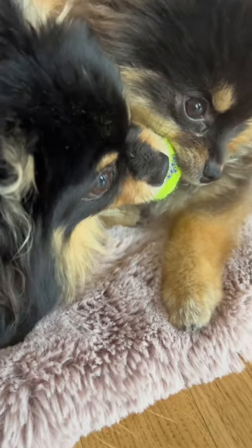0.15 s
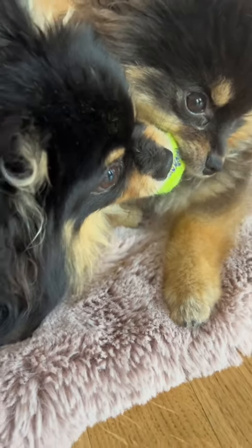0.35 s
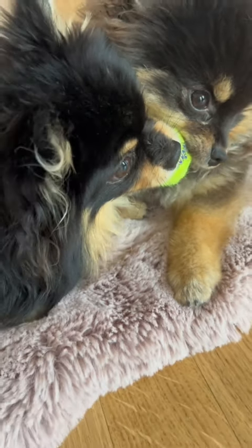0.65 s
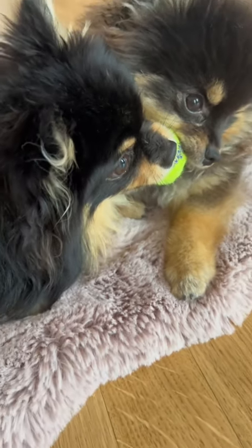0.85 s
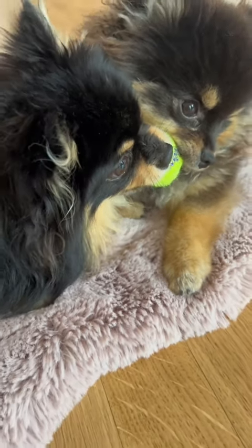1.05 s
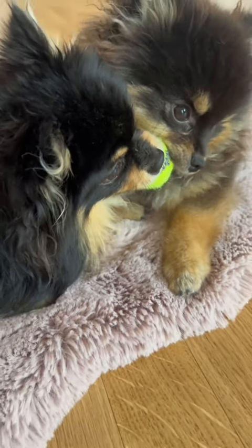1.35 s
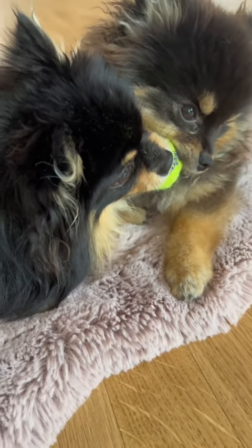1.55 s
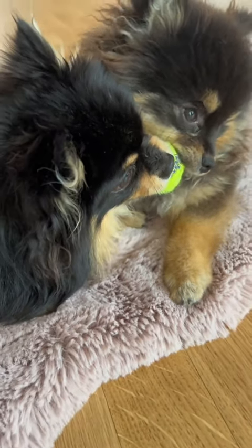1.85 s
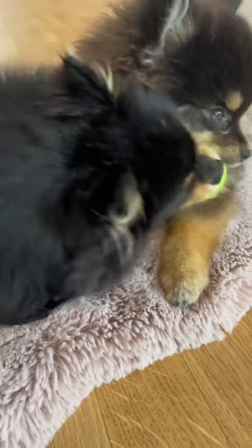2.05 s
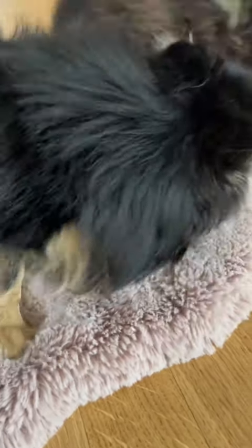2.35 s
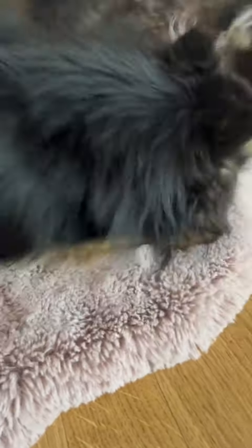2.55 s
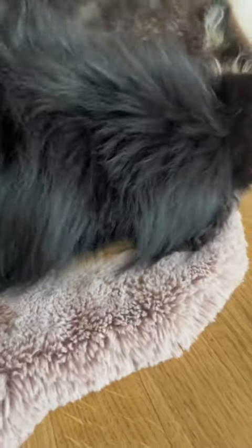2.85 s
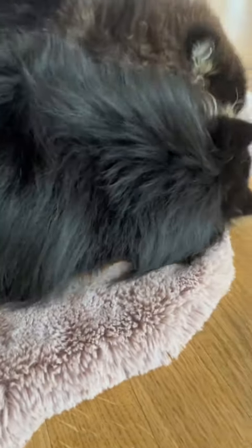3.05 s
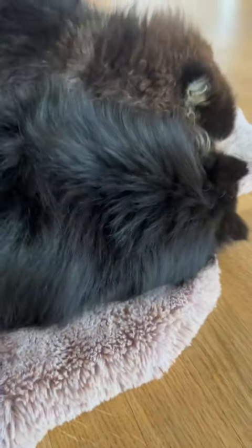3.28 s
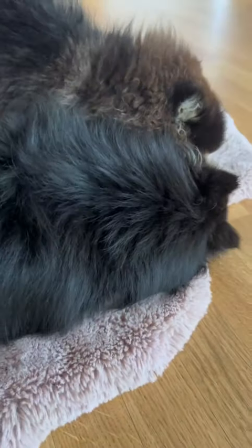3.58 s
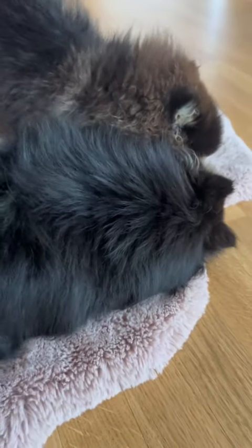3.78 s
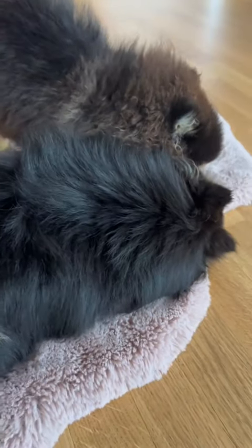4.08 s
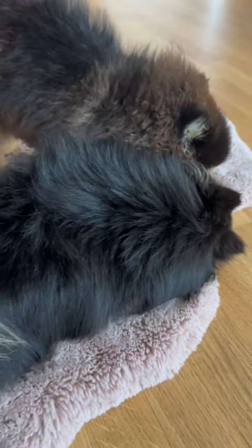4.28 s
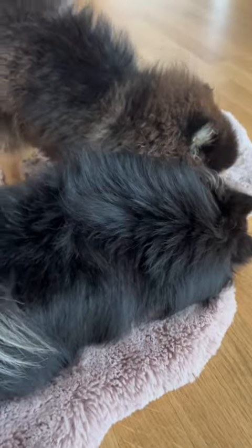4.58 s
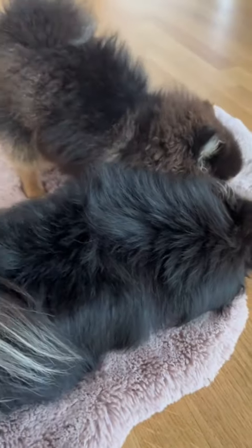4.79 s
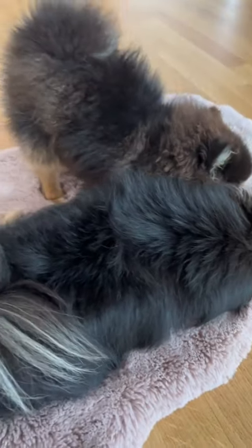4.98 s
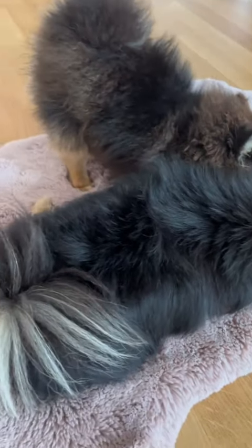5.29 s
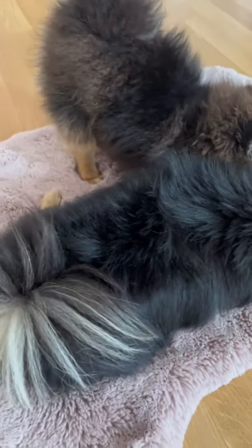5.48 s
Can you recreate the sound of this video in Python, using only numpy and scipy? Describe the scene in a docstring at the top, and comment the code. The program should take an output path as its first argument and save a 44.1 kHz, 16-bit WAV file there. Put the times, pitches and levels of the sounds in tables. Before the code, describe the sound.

Two small fluffy dogs tussle over a ball on a plush bed in a quiet wooden-floored room. Near the stereo microphone, a choppy growl is followed by a fierce fluttering roll with toothy hiss and a snort. Snuffles, a tooth click and short grunts come next, then a softer choppy growl, and finally a low growl that smooths into a steady note.

```python
"""Two small dogs tussle over a ball on a soft bed, close to the microphone, in a quietly humming room.
First come choppy growls, each a chain of bursts of slow vocal-fold slaps, and teeth click on the ball.
Then the bursts merge into a fierce fluttering roll, with air hissing past the teeth and a snort at the end.
After snuffles, chuffs into fur, a click of teeth and short grunts, a softer choppy growl follows.
The last growl starts in bursts, merges into a soft roll and settles on a steady note."""
import sys
import numpy as np
from scipy import signal
from scipy.fft import rfft, irfft, next_fast_len
from scipy.io import wavfile

SR = 44100
rng = np.random.default_rng(int(sys.argv[2]) if len(sys.argv) > 2 else 0)


def materialize(psi):
    """Save the field psi as 16-bit PCM at rate SR to the path in sys.argv[1].

    A 1-D psi becomes a single channel; in a 2-D psi each row is a channel.
    """
    bounded = np.clip(np.atleast_2d(psi).T, -1, 1)
    quanta = np.round(bounded * 32767).astype(np.int16)
    wavfile.write(sys.argv[1], SR, quanta)


N = 248265
TIME = np.arange(N) / SR


def from_db(db):
    """Turn decibels into gain."""
    return 10 ** (np.asarray(db) / 20)


def rms_one(x):
    """Scale a signal to unit power."""
    return x / np.sqrt(np.mean(x ** 2) + 1e-20)


def at_hz(rows, hz, axis=1):
    """Read one column of a table along log frequency."""
    rows = np.array(rows)
    return np.interp(np.log(hz + 1e-3), np.log(rows[:, 0]), rows[:, axis])


def colour(x, spectrum):
    """Filter a signal with a table of gains by frequency."""
    size = next_fast_len(N + 4096)
    gain = from_db(at_hz(spectrum, np.fft.rfftfreq(size, 1 / SR)))
    return irfft(rfft(x, size) * gain, size)[..., :N]


def noise(spectrum):
    """Make coloured noise of unit power."""
    return rms_one(colour(rng.standard_normal(N), spectrum))


def convolve(x, response):
    """Play a signal through an impulse response."""
    return signal.fftconvolve(x, response)[:N]


def clicks(times, heights):
    """Place single-sample impulses."""
    samples = np.clip(np.round(times * SR).astype(int), 0, N - 1)
    return np.bincount(samples, heights, N)


def fading(x, decay_s):
    """Let each impulse die away exponentially."""
    return signal.lfilter([1], [1, -np.exp(-1 / (decay_s * SR))], x + 1e-18)


def swells(rows):
    """Add up bell-shaped swells of level."""
    return sum(from_db(db) * np.exp(-.5 * ((TIME - s) / half) ** 2) for s, half, db in rows)


def drift(rate=8):
    """Wander slowly by chance, with new values at the given rate per second."""
    knots = rng.standard_normal(256)
    return np.interp(TIME * rate, np.arange(len(knots)), knots)


def throat(times, heights, spectrum, lag_s, knee_hz=1500, size=4096):
    """Slaps ring in the throat; the bass trails the treble, so each one is a tiny falling chirp."""
    hz = np.fft.rfftfreq(size, 1 / SR)
    # minimum phase: the ring starts at once and never before the slap
    cepstrum = irfft(np.log(from_db(at_hz(spectrum, hz))))
    fold = np.r_[1, np.full(size // 2 - 1, 2), np.zeros(size // 2)]
    causal = np.exp(rfft(cepstrum * fold))
    delay = lag_s / (1 + (hz / knee_hz) ** 2)
    slap = irfft(causal * np.exp(-2j * np.pi * np.cumsum(delay) * SR / size))
    # a slap is timed by the moment at which its middle register peaks
    middle = np.abs(np.fft.ifft(rfft(slap) * ((hz > 450) & (hz < 1150)), size))
    starts = times - np.argmax(middle) / SR
    slap = slap / np.abs(signal.hilbert(slap)).max()
    # closing folds make a drop in pressure
    return convolve(clicks(starts, -heights), slap)


# quiet of the house: [pitch_hz, relative_level_db]
HOUSE_COLOUR = [(25, -22), (45, -8.5), (65, 0), (90, -4), (140, -9), (250, -21), (500, -33), (1000, -39),
                (2000, -42.5), (3700, -42.5), (4150, -40), (5100, -51.5), (6500, -46.5), (8000, -54),
                (12000, -50.5), (16000, -57.5)]
# household hum and whine: [pitch_hz, middle_level_db]
HUM_TONES = [(65, -71), (1400, -103), (4130, -96)]


def background(waver_db=3.0, rumble_db=-61):
    """Low rumble of the house, as noise, with faint sine hums and whine that waver in level."""
    hum = 0
    for hz, db in HUM_TONES:
        level = from_db(db + waver_db * drift())
        hum = hum + level * np.sqrt(2) * np.sin(2 * np.pi * hz * TIME)
    rumble = np.array([noise(HOUSE_COLOUR) for ear in range(2)])
    return from_db(rumble_db) * rumble + hum


# the bed shifting under the dogs' weight: [centre_s, half_length_s, level_db]
BED_STIRS = [(.45, 0.29, -57.5), (1.4, 0.22, -58.5), (1.9, 0.031, -53), (2.35, 0.21, -57),
             (3.4, 0.34, -63.5), (4.75, 0.34, -64.5)]
# colour of the shifting bed: [pitch_hz, relative_level_db]
BED_COLOUR = [(25, -24), (50, -7.5), (68, 4), (90, -4.5), (130, -23), (400, -52)]


def bed_stirs():
    """The bed shifts under the dogs' weight: slow swells of deep noise."""
    return swells(BED_STIRS) * noise(BED_COLOUR)


# room echoes: [pitch_hz, reflected_db, time_to_fade_60_db_s, left_right_likeness, left_minus_right_db]
ROOM_ECHOES = [(60, -34, 0.64, 0.53, 15), (130, -11.5, 0.93, 0.58, -33.5), (196, -12.5, 0.51, 1, -14),
               (375, -8, 0.34, 0.99, 13.5), (625, -8.5, 0.21, 0.082, -12), (1060, -3.5, 0.36, 0.06, 1),
               (2950, -6, 0.029, 0.16, 0.5), (12000, -13, 0.62, 0.34, -1)]


def room(x, first_s=0.01):
    """Diffuse reflections die away band by band, more alike at both ears in the bass."""
    t = TIME[:SR]
    out = np.zeros((2, SR))
    edges = np.geomspace(45, 16000, 18)
    for low, high in zip(edges, edges[1:]):
        centre_hz = np.sqrt(low * high)
        db, t60, alike, tilt_db = (at_hz(ROOM_ECHOES, centre_hz, axis=k) for k in range(1, 5))
        alike = np.clip(alike, -1, 1)
        decay = from_db(-60 * t / t60) * (t > first_s)
        tails = rng.standard_normal((2, SR)) * decay / np.linalg.norm(decay)
        band = signal.butter(2, [low, high], "band", fs=SR, output="sos")
        mid, side = signal.sosfilt(band, tails)
        pair = np.sqrt((1 + alike) / 2) * mid + np.sqrt((1 - alike) / 2) * side * [[1], [-1]]
        out += from_db(db + tilt_db * np.array([[.5], [-.5]])) * pair
    return np.array([convolve(x, ear) for ear in out])


# what the floor throws back: [pitch_hz, relative_level_db]
FLOOR_COLOUR = [(250, -25), (500, -23), (1000, 0), (3000, -7), (12000, -10.5)]


def floor_bounce(x, left_s=0.0042, right_s=0.0042, level_db=-11):
    """The wooden floor returns each slap a few milliseconds later, which fills the gaps between them."""
    echo = from_db(level_db) * colour(x, FLOOR_COLOUR)
    return np.array([np.interp(TIME - delay, TIME, echo) for delay in (left_s, right_s)])


# narrow resonances of the corner where the dogs lie: [pitch_hz, width_hz, level_db]
CORNER_TONES = [(206.4, 3.2, -2), (384, 14, -26), (698, 37, -10), (920, 45, -3), (1335, 17, 3)]


def corner(x):
    """A few resonances between bed, floor and walls ring on after each slap."""
    out = x
    for hz, width, db in CORNER_TONES:
        out = out + from_db(db) * signal.lfilter(*signal.iirpeak(hz, hz / width, fs=SR), x)
    return out


# left-right balance of the direct sound: [pitch_hz, left_minus_right_db]
LEFT_RIGHT = [(350, 0), (480, 2.5), (700, 5), (1100, 4), (1600, 0), (2200, -1), (4000, .5), (7000, 0)]


def direct_sound(x):
    """The straight path to both ears, leaning left mainly in the middle register."""
    return np.array([colour(x, [(hz, side * db) for hz, db in LEFT_RIGHT]) for side in (.5, -.5)])


# claws brushing the plush: [centre_s, half_length_s, level_db]
CLAW_BRUSHES = [(2.025, 0.013, -74.5), (2.755, 0.018, -82.5), (5.112, 0.018, -78)]
# colour of a brush: [pitch_hz, relative_level_db]
BRUSH_COLOUR = [(3500, -30), (5000, 0), (7000, 2.5), (9000, -7.5), (14000, -18)]


def brushes():
    """Claws make short dry strokes over the bed: swells of bright noise."""
    return swells(CLAW_BRUSHES) * noise(BRUSH_COLOUR)


# snorts, snuffles and brushes of fur: [centre_s, half_length_s, level_db]
SNORT_TIMES = [(.603, 0.017, -57), (1.9, 0.014, -58.5), (2.025, 0.074, -79), (2.155, 0.026, -71),
               (2.3, 0.073, -69), (2.44, 0.029, -69), (2.525, 0.027, -63), (3.41, 0.025, -68),
               (3.58, 0.024, -63.5), (4.08, .11, -89), (5.385, 0.017, -68.5)]
# colour of a snort: [pitch_hz, relative_level_db]
SNORT_COLOUR = [(60, -7), (300, 28), (900, -5.5), (1500, 9), (2600, 10.5), (4000, 3), (5500, 0.5),
                (7500, -0.5), (10000, -3), (12500, 3), (13500, -19), (16000, -28.5)]


def snorts():
    """Snorts, snuffles and rustling fur: swells of broad noise."""
    return swells(SNORT_TIMES) * noise(SNORT_COLOUR)


# a thin whistle in the nose: [centre_s, half_length_s, level_db]
WHISTLE_TIMES = [(2.25, 0.025, -73), (3.24, 0.036, -83), (3.43, 0.048, -70.5), (3.5, 0.0083, -84)]
# colour of the whistle: [pitch_hz, relative_level_db]
WHISTLE_COLOUR = [(2200, -10), (2750, 1.5), (3000, 16), (3250, -18), (3800, 0.5), (4700, -30), (5500, -30)]


def nose_whistles():
    """Air whistles thinly in the nose: noise gathered near one pitch."""
    return swells(WHISTLE_TIMES) * noise(WHISTLE_COLOUR)


# muzzles bumping and chuffing into fur: [centre_s, half_length_s, level_db]
CHUFF_TIMES = [(2.177, 0.0058, -51), (2.2025, 0.0026, -44), (2.215, 0.0071, -44), (2.441, 0.0049, -44.5),
               (3.01, 0.021, -58), (3.62, 0.051, -64), (5.37, 0.057, -61.5)]
# colour of a chuff: [pitch_hz, relative_level_db]
CHUFF_COLOUR = [(40, -20.5), (120, 8), (220, 5), (450, -3), (750, -2.5), (1050, -5), (1300, -16.5),
                (1700, -32), (2700, -20), (3600, -44), (8000, -40.5)]


def chuffs():
    """Muzzles bump and chuff into fur: short swells of dull noise."""
    return swells(CHUFF_TIMES) * noise(CHUFF_COLOUR)


# breath let out through bared teeth after a growl: [centre_s, half_length_s, level_db]
EXHALE_TIMES = [(.598, 0.015, -61.5), (1.888, 0.01, -64)]
# hiss of air at the teeth: [pitch_hz, relative_level_db]
HISS_COLOUR = [(4000, -35), (6500, -36), (8300, -28), (10200, -18), (11000, -10.5), (12500, -7.5),
               (12950, -7), (13300, -19), (14200, -24), (15500, -34)]


def exhales():
    """Breath leaves through bared teeth: short swells of hiss."""
    return swells(EXHALE_TIMES) * noise(HISS_COLOUR)


# teeth on the ball: [start_s, start_level_db]
BITES = [(0.178, -60), (2.1997, -41)]
# colour of a tooth click: [pitch_hz, relative_level_db]
TOOTH_COLOUR = [(600, -33), (1600, -18), (2700, 27.5), (4000, -10.5), (6000, 11), (9000, 19), (12000, 20),
                (14000, -6), (16000, -10)]


def teeth():
    """Teeth click on the ball: bright noise that starts at once and dies away fast."""
    s, db = np.transpose(BITES)
    return fading(clicks(s, from_db(db)), decay_s=0.0024) * noise(TOOTH_COLOUR)


# wet clicks of the lips and tongue: [peak_s, peak_db]
SMACK_TIMES = [(2.0767, -41.5), (2.51, -51), (2.838, -57)]
# colour of the mouth as it rings: [pitch_hz, relative_level_db]
SMACK_COLOUR = [(60, -20.5), (190, 15), (400, -2.5), (700, -16), (1100, -10), (1700, -33.5), (2700, -13),
                (3300, -46), (6000, -35.5)]


def smacks():
    """Lips and tongue part with a click that rings in the mouth."""
    s, db = np.transpose(SMACK_TIMES)
    return throat(s, from_db(db), SMACK_COLOUR, lag_s=0.0039, knee_hz=710)


# moments at which the pose changes: [time_s]
POSE_TIMES = [2, 3, 4]


def pose_at(times):
    """Number the pose: 0 bared teeth, 1 smothered in fur, 2 head turned away, 3 low, mouth on the ball."""
    return np.digitize(times, POSE_TIMES)


# air through the mouth, one row a pose: [rasp_db, hiss_db, gargle_db]
POSE_BREATH = [(-58, -64.5, -55.5), (-74.5, -84.5, -59.5), (-80, -80, -54.5), (-76.5, -82.5, -61)]
# moments from which a growl uses up breath: [start_s]
BREATH_STARTS = [.2, 1.13, 3.14, 4.54]
# colours of air in the mouth, in the throat and past gaping teeth: [pitch_hz, relative_level_db]
RASP_COLOUR = [(500, 0), (900, 13), (1400, 8.5), (2400, 3), (2900, 6), (3300, -2.5), (3700, -47),
               (5300, -11.5), (6500, -45)]
GARGLE_COLOUR = [(120, -14.5), (300, 1), (650, 2.5), (1000, -0.5), (1250, -8), (1600, -46), (3000, -59.5)]
GAPING_HISS_COLOUR = [(4000, -56), (6900, -22.5), (7500, -17.5), (8600, -16.5), (9500, -20), (10400, -11.5),
                      (11400, -9.5), (12550, -3), (13000, -8.5), (13300, -25), (14100, -28), (15500, -40)]


def mouth_air(times, heights, lead_s=0.0052, puff_s=0.0034, linger_s=0.027,
              rasp_leak=0.14, hiss_leak=0.33, gargle_leak=0.32,
              db_per_slap_db=0.97, fade_db_per_s=7, last_puff_db=16.5):
    """Air puffs out just ahead of every slap, in step with its strength, as gargle, rasp and hiss."""
    pose = pose_at(times)
    usual = np.bincount(pose, heights) / np.bincount(pose)
    # the air weakens as a growl uses up the breath
    spent_s = sum((times - s) * (times > s) * (times < s + .85) for s in BREATH_STARTS)
    push = (heights / usual[pose]) ** db_per_slap_db * from_db(-fade_db_per_s * spent_s)
    # extra rasp as the folds part: many slaps just before, none just after
    ahead = times - times[:, None]
    followed = ((ahead > 0) & (ahead < .1)).any(1)
    slaps_before = ((ahead < 0) & (ahead > -.2)).sum(1)
    last = ~followed & (slaps_before > 10)
    rasp, hiss, gargle = from_db(POSE_BREATH)[pose].T
    # the hiss has another colour while the jaws gape in the fierce roll
    gaping = (times > FIERCE_CURVE[0][0]) & (times < FIERCE_CURVE[-1][0])
    layers = ((rasp * from_db(last_puff_db * last), RASP_COLOUR, rasp_leak),
              (gargle, GARGLE_COLOUR, gargle_leak),
              (hiss * ~gaping, HISS_COLOUR, hiss_leak),
              (hiss * gaping, GAPING_HISS_COLOUR, hiss_leak))
    out = 0
    for gain, spectrum, leak in layers:
        puffs = clicks(times - lead_s, push * gain)
        flow = fading(puffs, puff_s) + leak * fading(puffs, linger_s)
        white = rng.standard_normal(N)
        out = out + colour(white * flow, spectrum) / np.std(colour(white, spectrum))
    return out


# soft hums at the end of a growl: [start_s, starting_pitch_hz, level_before_fades_db]
RELEASE_HUMS = [(0.573, 195, -29.5), (1.872, 209, -20), (2.273, 222.6, -30.5), (3.534, 203.4, -28.5),
                (5.335, 211, -32.5)]


def releases(attack_s=0.0025, decay_s=0.0092, sag=0.16, sag_s=.025):
    """No longer touching, the folds swing out as a near sine that sags in pitch."""
    out = 0
    for s, hz, db in RELEASE_HUMS:
        t = np.maximum(TIME - s, 0)
        pitch = hz * (1 - sag * (1 - np.exp(-t / sag_s)))
        level = from_db(db) * (1 - np.exp(-t / attack_s)) * np.exp(-t / decay_s)
        out = out + level * np.sin(2 * np.pi * np.cumsum(pitch * (t > 0)) / SR)
    return out


# separate grunts and bursts of growling: [start_s, slap_count, middle_pitch_hz, middle_level_db]
GROWL_BURSTS = [(0.1051, 1, 111, -26.5), (0.1444, 1, 110, -23), (0.1781, 1, 110, -23.5),
                (0.2038, 3, 126.9, -22.5), (0.2346, 4, 132.7, -23.5), (0.2689, 5, 128.3, -24),
                (0.3152, 4, 130, -23.5), (0.352, 5, 128.9, -24.5), (0.3944, 4, 130, -23.5),
                (.426, 1, 111, -33.5), (0.4384, 4, 110.3, -26.5), (0.4857, 1, 110, -35),
                (.4957, 3, 110.8, -26), (0.5451, 1, 116, -23.5), (0.5557, 3, 117.5, -29),
                (1.1052, 1, 110, -26.5), (1.128, 2, 116, -25), (1.1496, 1, 109.5, -36.5),
                (1.1636, 3, 124.8, -24.5), (1.195, 4, 117.7, -26), (2.2129, 1, 110, -41),
                (2.2268, 3, 111.6, -22.5), (2.2544, 2, 105.3, -26), (2.273, 1, 110, -35),
                (2.425, 7, 334.4, -43.5), (2.7559, 1, 110, -37), (2.782, 2, 78.6, -35),
                (3.137, 3, 112.7, -32), (3.1699, 3, 108.2, -30.5), (3.2072, 3, 105.2, -30.5),
                (3.2429, 3, 108, -32.5), (3.2839, 3, 113.6, -30.5), (3.3187, 5, 111.7, -32.5),
                (3.368, 4, 109.1, -31.5), (3.4169, 4, 112.6, -32), (3.458, 6, 109.4, -30),
                (3.5134, 3, 111.3, -34.5), (4.4717, 2, 99.9, -37.5), (4.539, 2, 99, -35),
                (4.5756, 2, 102, -33), (4.6151, 2, 114.4, -33), (4.6452, 2, 109.5, -34),
                (4.683, 2, 107.5, -34.5), (4.7069, 4, 112.5, -33), (4.751, 3, 115.8, -34.5),
                (4.778, 4, 117.9, -33.5)]


def burst_slaps(jitter_s=.0001, shimmer_db=1.55, arch_db=2.5, rise_db=1.5, quicken=0.062):
    """Within a burst the slaps come faster towards the end, and are strongest past the middle."""
    times, heights = [], []
    for s, slaps, hz, db in GROWL_BURSTS:
        k = np.arange(round(slaps))
        along = (k + .5) / len(k)
        arch = np.sin(np.pi * along)
        arch -= arch.mean()
        chance = rng.standard_normal((len(k), 2))
        # the middle slaps come late, so the gaps shrink along the burst
        times.append(s + (k + 2 * quicken * arch) / hz + jitter_s * chance[:, 0])
        level_db = db + arch_db * arch + rise_db * (along - .5) + shimmer_db * chance[:, 1]
        heights.append(from_db(level_db))
    return np.concatenate(times), np.concatenate(heights)


# throat and muzzle colour in each pose: [pitch_hz, relative_level_db]
BARED_COLOUR = [(55, -53.5), (100, -15), (170, -4.5), (215, -1.5), (280, -5.5), (390, -7.5), (550, -18),
                (720, -15), (990, -26.5), (1170, -33), (1400, -39), (1800, -41.5), (3000, -62),
                (3500, -84.5), (4000, -106)]
SMOTHERED_COLOUR = [(55, -24.5), (100, -8.5), (165, 2), (215, 5.5), (280, 1), (400, -5), (500, -8.5),
                    (720, -8.5), (950, -19), (1120, -42.5), (1500, -67.5), (2700, -36), (3300, -64),
                    (4000, -85)]
TURNED_AWAY_COLOUR = [(55, -58.5), (100, -13), (165, -6), (215, 2.5), (270, -9), (330, -5), (480, -16.5),
                      (700, -14.5), (950, -19.5), (1250, -29), (1600, -47), (3000, -80), (4000, -96.5)]
LOW_COLOUR = [(55, -74.5), (100, -16), (160, 3.5), (220, 0.5), (300, -2.5), (480, -13), (640, -12.5),
              (950, -18.5), (1200, -26), (1600, -62), (2200, -86.5), (4000, -100)]
# how far the deepest bass trails the treble, one entry a pose: [lag_s]
POSE_LAGS = [0.00589, 0.008, 0.0061, 0.0099]


def choppy_growls(times, heights):
    """Each burst of slaps rings in a throat coloured by the pose of the moment."""
    pose = pose_at(times)
    colours = (BARED_COLOUR, SMOTHERED_COLOUR, TURNED_AWAY_COLOUR, LOW_COLOUR)
    return sum(throat(times, heights * (pose == k), spectrum, POSE_LAGS[k])
               for k, spectrum in enumerate(colours))


def rolling_slaps(curve, jitter_s, shimmer_db, second_at=0.429, flutter_db=2.8, flutter_bend=.12):
    """The folds vibrate without a break while a flutter sways pitch and strength; a second slap follows."""
    s, *columns = np.transpose(curve)
    hz, db, flutter_hz, depth, second = (np.interp(TIME, s, c) for c in columns)
    sounding = (TIME >= s[0]) & (TIME < s[-1])
    flutter = -depth * np.cos(2 * np.pi * np.cumsum(flutter_hz * sounding) / SR)
    cycles = np.cumsum(hz * (1 + flutter_bend * flutter) * sounding) / SR
    at = np.flatnonzero(np.diff(np.ceil(cycles)))  # one main slap per cycle
    chance = rng.standard_normal((len(at), 3))
    times = TIME[at] + jitter_s * chance[:, 0]
    heights = from_db(db[at] + flutter_db * flutter[at] + shimmer_db * chance[:, 1])
    second_times = times + second_at / hz[at] + jitter_s * chance[:, 2]
    return (times, heights), (second_times, heights * second[at])


# soft roll: [time_s, middle_pitch_hz, middle_level_db, flutter_per_s, flutter_depth_0_to_1,
#             second_slap_strength_0_to_1]
SOFT_CURVE = [(4.82, 113.7, -34.5, 32.7, .55, 0), (4.89, 112.4, -34.5, 25.1, 1, 0),
              (4.96, 113.5, -34.5, 25.1, .64, 0), (5.03, 116.8, -33.5, 23.8, .37, 0),
              (5.11, 115.3, -32.5, 23.2, .15, 0), (5.14, 114.1, -33, 20.4, .45, 0),
              (5.165, 115.3, -32, 20.4, .35, 0), (5.2, 116, -32.5, 23.5, .12, 0),
              (5.25, 112.3, -32.5, 24.6, 0, 0), (5.3, 115.7, -33, 24.6, .12, 0),
              (5.332, 104.7, -35, 24.5, 0, 0), (5.36, 100, -45, 24.5, 0, 0)]
# colour of the steady note, mouth open and mouth closed: [pitch_hz, relative_level_db]
OPEN_COLOUR = [(55, -53.5), (115, -7.5), (230, 3), (345, -1), (460, -17), (575, -8.5), (690, -19.5),
               (810, -6.5), (950, -23.5), (1250, -26.5), (1600, -60), (4000, -99)]
CLOSED_COLOUR = [(55, -67), (115, -9), (230, 3), (345, 1.5), (460, -21), (575, -5.5), (690, -17),
                 (810, -8.5), (950, -24.5), (1250, -28.5), (1600, -57), (4000, -87.5)]


def settling_growl(times, heights, clear_s=5.0, clear_width_s=.04, close_s=5.135, close_width_s=.012):
    """The low growl clears little by little into a note, then the closing mouth changes its colour."""
    clear = .5 + .5 * np.tanh((times - clear_s) / clear_width_s)
    shut = .5 + .5 * np.tanh((times - close_s) / close_width_s)
    shares = ((1 - clear, LOW_COLOUR), (clear * (1 - shut), OPEN_COLOUR), (clear * shut, CLOSED_COLOUR))
    return sum(throat(times, heights * share, spectrum, POSE_LAGS[-1]) for share, spectrum in shares)


# fierce roll: [time_s, middle_pitch_hz, middle_level_db, flutter_per_s, flutter_depth_0_to_1,
#               second_slap_strength_0_to_1]
FIERCE_CURVE = [(1.231, 121.3, -25.5, 31.7, .54, .2), (1.28, 124.5, -26, 28.1, .52, .16),
                (1.33, 126.8, -25, 25.5, .88, .22), (1.385, 136.9, -24, 28.1, .39, .34),
                (1.44, 123.8, -24.5, 22.3, .95, .39), (1.5, 122.2, -25.5, 25.4, .82, .29),
                (1.55, 121.7, -26, 23.4, 1, .25), (1.6, 128.8, -26, 21.6, .73, .25),
                (1.65, 117.9, -25.5, 24.3, .94, .25), (1.71, 121.3, -24.5, 24, 1, .23),
                (1.78, 127.7, -25, 24.2, .32, .09), (1.83, 114.5, -26, 28.5, .53, .05),
                (1.875, 100.3, -26.5, 30.8, .41, .05)]
# throat colour with the jaws wide on the ball: [pitch_hz, relative_level_db]
GAPING_COLOUR = [(55, -52.5), (90, -24), (125, -6.5), (175, 3), (215, 1), (270, -6.5), (390, -8),
                 (550, -19), (710, -15), (830, -20.5), (990, -21), (1170, -35), (1400, -39), (1800, -44),
                 (3000, -44.5), (3500, -93.5), (4000, -106)]


def fierce_growl(times, heights):
    """The unbroken slaps of the fierce roll ring in a throat with the jaws wide open."""
    return throat(times, heights, GAPING_COLOUR, POSE_LAGS[0])


# how strongly each pose sounds into the room: [level_db]
POSE_ROOM_LEVELS = [-2.5, 0.5, 0.5, 4]


def scene():
    """The dogs, a little to the left, in the room."""
    choppy = burst_slaps()
    soft, soft_second = rolling_slaps(SOFT_CURVE, jitter_s=.00007, shimmer_db=.7)
    fierce, fierce_second = rolling_slaps(FIERCE_CURVE, jitter_s=.00005, shimmer_db=.5)
    voice = choppy_growls(*choppy)
    voice = voice + settling_growl(*np.hstack([soft, soft_second]))
    voice = voice + fierce_growl(*np.hstack([fierce, fierce_second]))
    # only the main slaps push out air
    air = mouth_air(*np.hstack([choppy, fierce, soft]))
    nose_and_breath = snorts() + nose_whistles() + chuffs() + exhales()
    dogs = voice + releases() + air + nose_and_breath + smacks() + brushes() + teeth()
    outward = dogs * from_db(POSE_ROOM_LEVELS)[pose_at(TIME)]
    heard = direct_sound(corner(dogs)) + floor_bounce(dogs) + room(outward)
    return heard + bed_stirs() + background()


def record(dry, narrow_below_hz=430, low_cut_hz=42, top_cut_hz=15750):
    """The microphone pair hears little width in the bass; the deepest rumble and the top are cut."""
    mid, side = (dry[0] + dry[1]) / 2, (dry[0] - dry[1]) / 2
    side = colour(side, [(narrow_below_hz / 2, -24), (narrow_below_hz, 0)])
    mid = colour(mid, [(low_cut_hz / 2, -16), (low_cut_hz, 0)])
    top_cut = signal.ellip(10, .1, 80, top_cut_hz, fs=SR, output="sos")
    return signal.sosfilt(top_cut, [mid + side, mid - side])


dry = scene()
out = record(dry)
materialize(out)
```